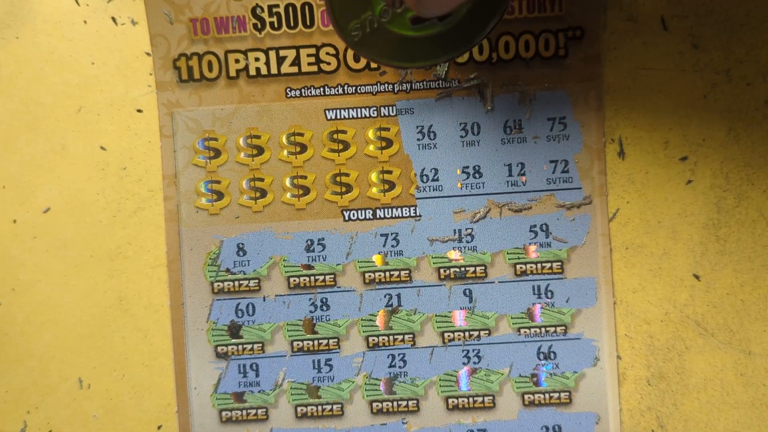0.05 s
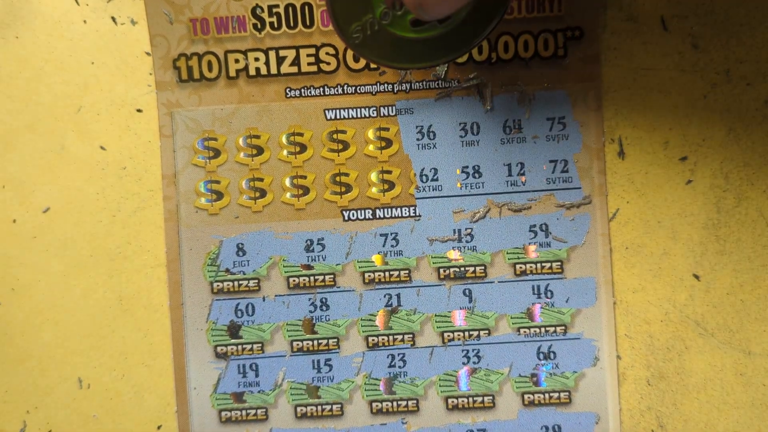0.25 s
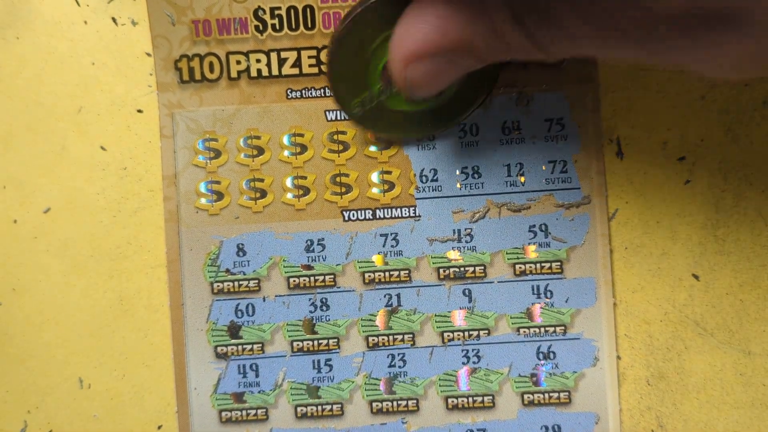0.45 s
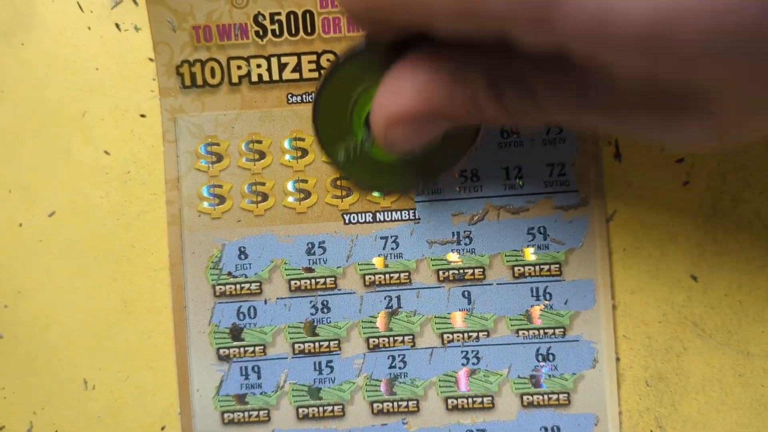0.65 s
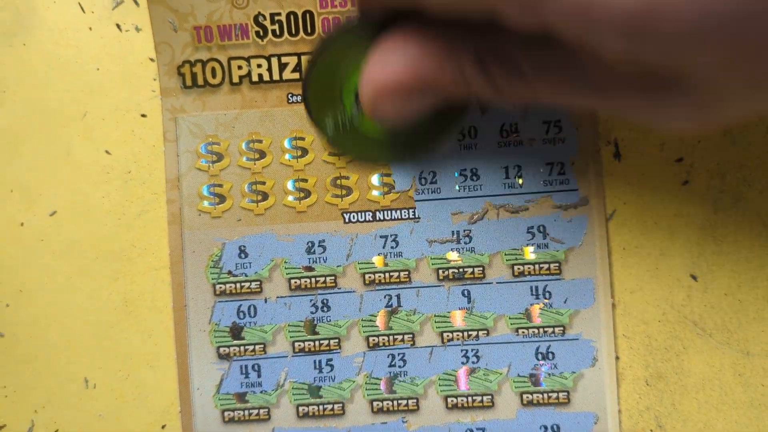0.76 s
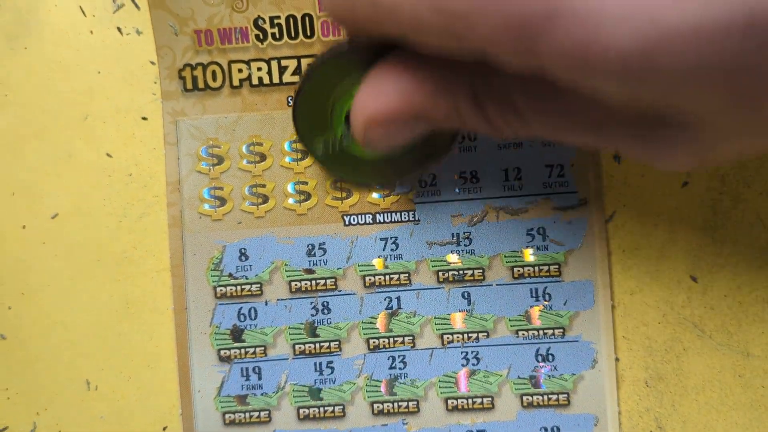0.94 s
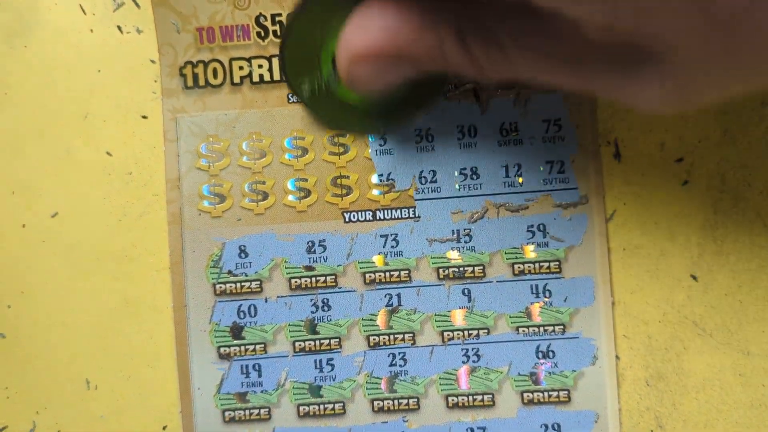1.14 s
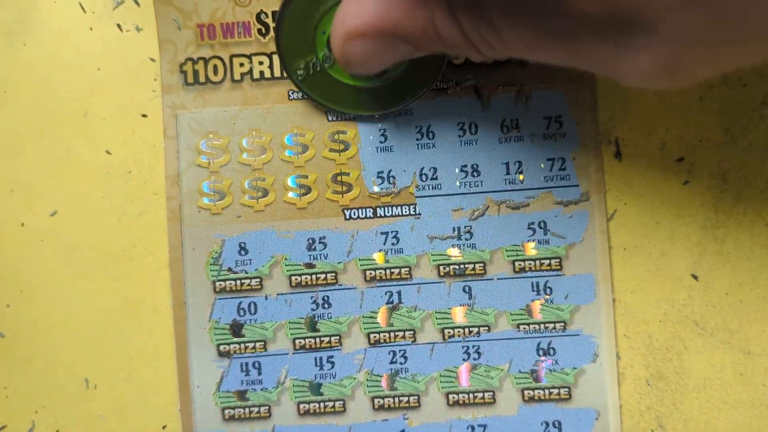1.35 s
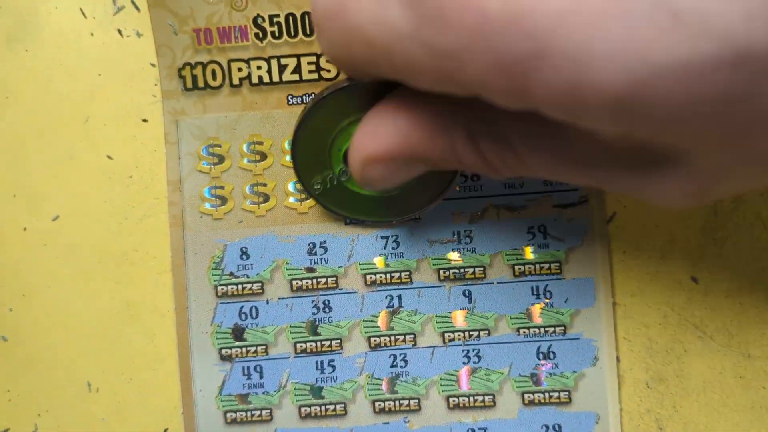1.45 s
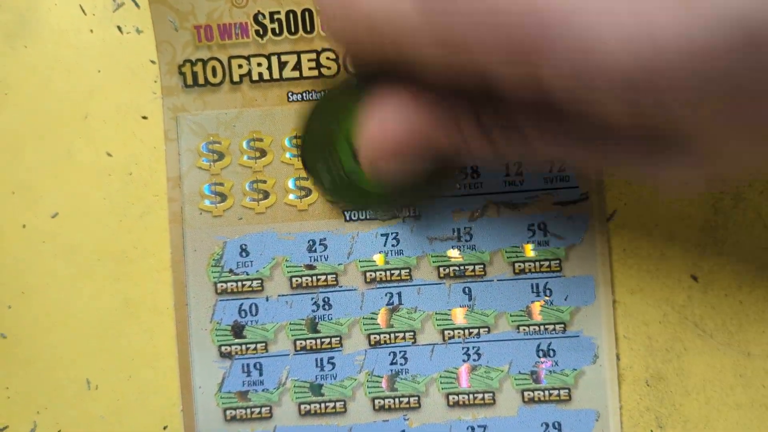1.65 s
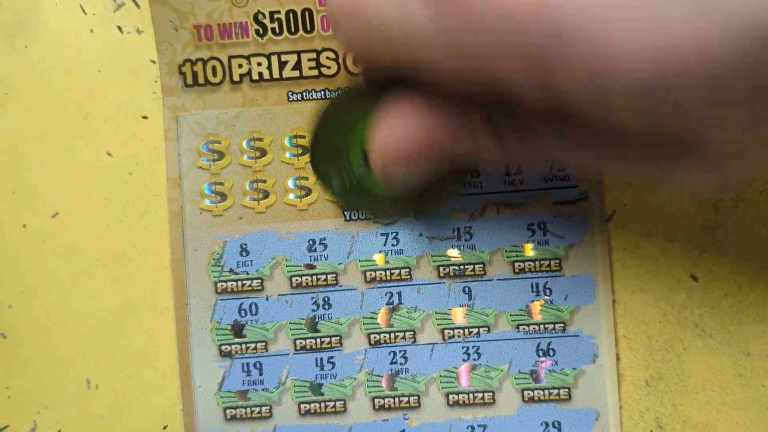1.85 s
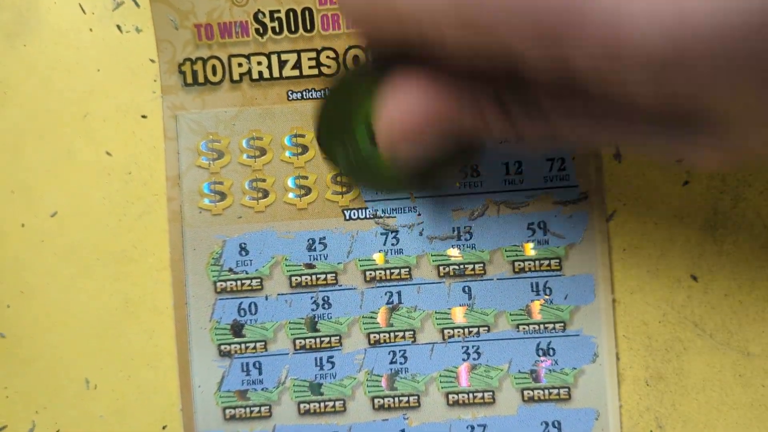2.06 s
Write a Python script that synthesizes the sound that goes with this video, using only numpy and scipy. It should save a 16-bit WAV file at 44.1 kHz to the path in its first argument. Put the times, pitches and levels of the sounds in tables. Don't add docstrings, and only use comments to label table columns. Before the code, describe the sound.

A plastic disc scrapes a paper ticket on a table, close and to the left. A small tick at 0.03 s, then a sharper tap at 0.4 s and a faint slide to 0.5 s. From 0.65 s, strong raspy strokes come and go, shorter and quicker from 1.5 s to the end near 2.1 s. Dull table knocks accompany them over low indoor rumble, faint hum and barely audible electric chirr.

```python
import sys
import numpy as np
from scipy import signal
from scipy.fft import rfft, irfft, next_fast_len
from scipy.io import wavfile
from scipy.ndimage import uniform_filter1d

SR = 44100
rng = np.random.default_rng(int(sys.argv[2]) if len(sys.argv) > 2 else 0)


def transcribe(u):
    v = np.clip(np.atleast_2d(u).T, -1, 1)
    q = np.round(v * 32767).astype(np.int16)
    wavfile.write(sys.argv[1], SR, q)


def field_ratio(decibels):
    return 10 ** (np.asarray(decibels, dtype=float) / 20)


N = 92565
SIZE = next_fast_len(N + 8192)
HZ = np.fft.rfftfreq(SIZE, 1 / SR)


def evened(x):
    return x / np.sqrt(np.mean(x ** 2) + 1e-20)


def wander(shape, span):
    noise = rng.standard_normal(shape)
    return evened(uniform_filter1d(uniform_filter1d(noise, span), span))


def read(points, column=1):
    p = np.array(points, float)
    return np.interp(np.log(HZ + 1), np.log(p[:, 0] + 1), p[:, column])


def through(x, response):
    return irfft(rfft(x, SIZE) * response, SIZE)[..., :N]


def band(hz, width_hz):
    return 1 / (1 + ((HZ - hz) / width_hz) ** 2)


def causal(db):
    c = irfft(db * np.log(10) / 20, SIZE)
    c[1:SIZE // 2] *= 2
    c[SIZE // 2 + 1:] = 0
    return np.exp(rfft(c))


def rings(modes, floor_db):
    skirt = 1.2
    power = field_ratio(floor_db) ** 2
    for hz, width, left_db, right_db in modes:
        gain = field_ratio(np.array([[left_db], [right_db]])) ** 2
        resonance = (HZ * width) ** 2 / ((hz ** 2 - HZ ** 2) ** 2 + (HZ * width) ** 2)
        power = power + gain * resonance * band(hz, skirt * width)
    body = np.array([causal(10 * np.log10(p)) for p in power])
    return body / np.sqrt(np.mean(abs(body) ** 2))


def tail(t60):
    t = np.arange(8000) / SR
    fade_in = np.minimum(t / 0.00033, 1)
    taps = rng.standard_normal((2, 8000)) * field_ratio(-60 * t / t60) * fade_in
    return rfft(taps / np.linalg.norm(taps[0]), SIZE)


def pressure(rows):
    sag_db, edge_db, steepness = 0.5, -60, 3.16
    t = np.arange(N) / SR
    power = 0
    for peak_s, rise_s, fall_s, db in rows:
        reach = np.minimum(abs(t - peak_s) / np.where(t < peak_s, rise_s, fall_s), 2)
        power = power + field_ratio(db + sag_db * reach + edge_db * reach ** steepness) ** 2
    return np.sqrt(power)


def slips(per_s, spread_db):
    clump_db, clump_s = 2.6, 0.0035
    happens = rng.random(N) < per_s / SR
    big = np.minimum(rng.exponential(1, N), 4)
    sign = rng.standard_normal(N)
    clump = wander(N, round(clump_s * SR))
    return evened(happens * sign * field_ratio(spread_db * big + clump_db * clump))


# (frequency [Hz], level [dB per Hz])
ROOM_NOISE = [(32, -65), (50, -12), (70, -7), (260, -18.5), (600, -43), (1400, -43), (5000, -53.5),
              (15500, -65)]
# (frequency [Hz], correlation [-1 to 1])
ROOM_LIKENESS = [(60, 1), (240, 0.84), (950, 0.14), (3770, -0.15), (15000, 0.09)]
# (frequency [Hz], width [Hz], level [dB])
ROOM_HUM = [(64.8, 4.9, -56)]


def room():
    level_db, left_db = -52.5, 1.0
    a, b = rfft(rng.standard_normal((2, SIZE)))
    same = np.clip(read(ROOM_LIKENESS), -1, 1)
    pair = np.array([a * field_ratio(left_db), same * a + np.sqrt(1 - same ** 2) * b])
    out = field_ratio(level_db) * evened(irfft(pair * field_ratio(read(ROOM_NOISE)), SIZE)[:, :N])
    for hz, width, db in ROOM_HUM:
        out = out + field_ratio(db) * evened(irfft(pair * band(hz, width), SIZE)[:, :N])
    return out


def chirr():
    puffs_per_s, puff_s, level_db = 100, 0.0007, -84
    since_puff = np.arange(N) / SR % (1 / puffs_per_s)
    puffs = np.exp(-since_puff / puff_s) * rng.standard_normal((2, N))
    return field_ratio(level_db) * evened(through(puffs, band(6400, 800)))


# (time [s], peak level [dB], dull above [Hz])
TICKS = [(0.0265, -22, 500), (.395, -14, 1700), (0.4708, -29.5, 2950), (0.4926, -16.5, 990),
         (0.6272, -24, 2360), (0.9159, -21.5, 2930), (1.052, -40, 3000), (1.179, -27, 3000),
         (1.415, -29, 1510), (1.426, -29.5, 5000), (1.651, -29, 6030), (1.8622, -26.5, 8000),
         (2.0734, -22, 7000)]


def ticks():
    out = np.zeros(N)
    t = np.arange(200) / SR
    for s, db, dull_hz in TICKS:
        blow = t ** 2 * np.exp(-3 * np.pi * dull_hz * t)
        out[round(s * SR):][:200] += field_ratio(db + 11) * blow / blow.sum()
    return out


def colours(count):
    depth_db, span_hz = 3.0, 350
    db = depth_db * wander((count, len(HZ)), round(span_hz / HZ[1]))
    mean_db = 10 * np.log10(np.mean(field_ratio(db) ** 2, axis=0))
    return [causal(row) for row in db - mean_db]


def rasp_at_spots(count):
    spot_s, spot_db = 0.024, 8
    slips_per_s, snags_per_s, snag_db, snag_dull_hz = 10000, 900, -3, 2500
    dull = 1 / (1 + 1j * HZ / snag_dull_hz) ** 2
    rasp = []
    for share in field_ratio(spot_db * wander((count, N), round(spot_s * SR))):
        fine = slips(slips_per_s / count, 1.5)
        snags = through(field_ratio(snag_db) * slips(snags_per_s / count, 2.5), dull)
        rasp.append(share * (fine + snags))
    rasp = np.array(rasp)
    span = round(0.02 * SR)
    power = uniform_filter1d(uniform_filter1d((rasp ** 2).sum(0), span), span // 2)
    return rasp / np.sqrt(power)


# (fastest moment [s], rise [s], fall [s], level [dB])
STROKES = [(.33, 0.047, 0.14, -69), (.475, 0.14, 0.13, -52), (.59, 0.028, 0.12, -63),
           (.635, 0.022, 0.062, -52), (.678, 0.038, 0.083, -27.5), (.82, 0.046, 0.067, -23.5),
           (.925, 0.028, .03, -48.5), (.958, .035, 0.092, -26), (1.06, 0.014, .03, -58),
           (1.105, 0.049, 0.057, -24), (1.225, 0.054, 0.084, -25.5), (1.24, 0.014, 0.037, -28),
           (1.338, 0.032, 0.073, -24), (1.38, 0.02, 0.021, -29), (1.456, .045, 0.036, -29.5),
           (1.497, 0.028, 0.027, -21.5), (1.566, 0.02, 0.031, -21), (1.605, 0.077, 0.033, -24),
           (1.686, 0.032, 0.027, -28.5), (1.69, 0.06, 0.036, -37.5), (1.716, 0.014, 0.039, -24.5),
           (1.785, 0.012, 0.017, -27), (1.812, 0.07, 0.018, -33.5), (1.836, 0.032, 0.012, -29),
           (1.885, 0.052, 0.1, -34.5), (1.918, 0.02, 0.019, -24), (1.938, .025, 0.018, -30),
           (1.992, 0.024, 0.041, -23.5), (2.043, 0.032, 0.024, -29.5), (2.088, 0.032, 0.069, -39)]
# (frequency [Hz], width [Hz], left [dB], right [dB])
DISC_MODES = [(1206, 110, -6, -17), (1530, 90, -8, -13), (1960, 200, -1, -15), (2200, 200, -5, -12),
              (2420, 130, -3, -19), (2560, 150, -2, -15), (2890, 170, 0, -16), (3730, 200, -13, -21),
              (4350, 500, -17, -24), (5350, 700, -18, -29), (6500, 700, -22, -28), (10050, 700, -33, -35),
              (12200, 900, -35, -34), (15300, 900, -43, -43)]
# (frequency [Hz], left [dB], right [dB])
BARE_RASP = [(430, -29, -53), (970, -18.5, -38.5), (2870, -4.5, -25), (3510, -21.5, -16),
             (7780, -32.5, -92), (7700, -32.5, -40), (10360, -42.5, -42), (13000, -45.5, -92)]
# (frequency [Hz], level [dB])
SCATTER = [(300, -30), (1000, -14), (2800, -10), (4500, -1), (15000, 1)]


def disc():
    spots, scatter_t60 = 4, 0.032
    body = rings(DISC_MODES, np.array([read(BARE_RASP, column=k) for k in (1, 2)]))
    drive = rasp_at_spots(spots) * pressure(STROKES)
    slide = pressure([(0.46, 0.093, 0.047, -45.5)]) * slips(10000, 1.5)
    slide = through(slide, band(1810, 400))
    scatter = field_ratio(read(SCATTER))
    out = through(ticks() + slide, body * (1 + scatter * tail(scatter_t60)))
    for spot, colour in zip(drive, colours(spots)):
        out = out + through(spot, body * colour * (1 + scatter * tail(scatter_t60)))
    return out


# (strongest moment [s], rise [s], fall [s], level [dB])
SHOVES = [(.46, 0.22, .17, -61), (.725, 0.083, 0.034, -36), (.83, 0.075, .07, -40.5),
          (.96, 0.037, 0.12, -35), (1.012, 0.038, 0.023, -32), (1.12, 0.094, 0.055, -44),
          (1.2, 0.023, 0.13, -41), (1.27, 0.049, 0.028, -30), (1.38, 0.094, 0.028, -40.5),
          (1.44, 0.041, 0.086, -47.5), (1.5, 0.043, 0.042, -36), (1.6, 0.11, 0.046, -45.5),
          (1.67, 0.066, 0.051, -46.5), (1.73, 0.031, .04, -35.5), (1.84, 0.19, 0.12, -44.5),
          (1.935, 0.042, 0.035, -31.5), (1.995, 0.048, 0.033, -36.5), (2.085, 0.097, 0.044, -46)]
# (frequency [Hz], width [Hz], left [dB], right [dB])
TABLE_MODES = [(115.6, 53, -1, -4), (249, 148, -0.5, -0.5), (330.7, 50, -1.5, 1.5), (518, 300, -7.5, -30),
               (617, 96, -2, -4.5)]


def table():
    knocks_per_s, spread_db, thud_db = 2700, 2.0, -15.5
    knocks = pressure(SHOVES) * slips(knocks_per_s, spread_db)
    return through(knocks + field_ratio(thud_db) * ticks(), rings(TABLE_MODES, -101))


def scene():
    right_lag_s, echo_db, echo_t60 = 0.000202, -34.5, 0.19
    lag = np.exp(-2j * np.pi * HZ * np.array([[0], [right_lag_s]]))
    echo = 1 + field_ratio(echo_db) * tail(echo_t60)
    return through(disc() + table(), echo * lag) + room() + chirr()


def roll_off(x):
    return signal.sosfilt(signal.butter(12, 15870, fs=SR, output="sos"), x)


def record(dry):
    limited = through(dry, 1 / (1 + (HZ / 15800) ** 300))
    return roll_off(limited)


dry = scene()
out = record(dry)
transcribe(out)
```